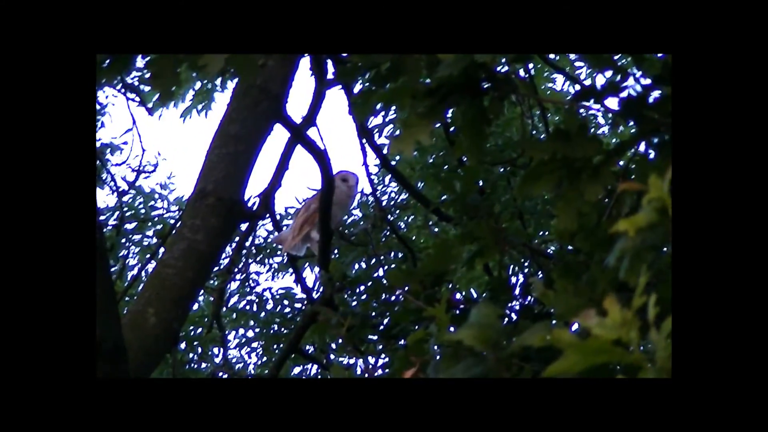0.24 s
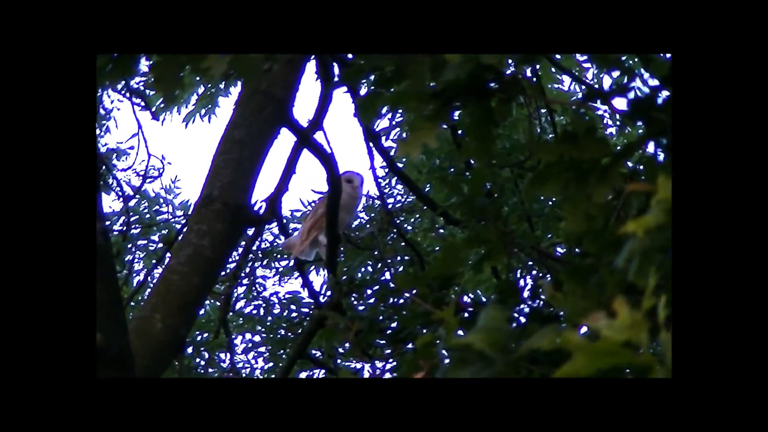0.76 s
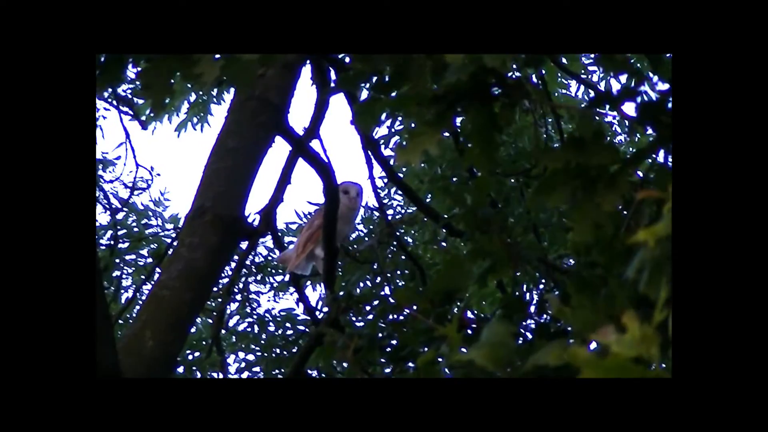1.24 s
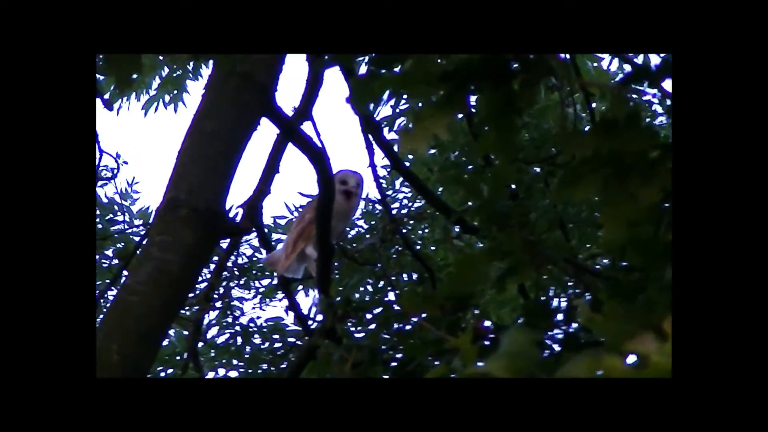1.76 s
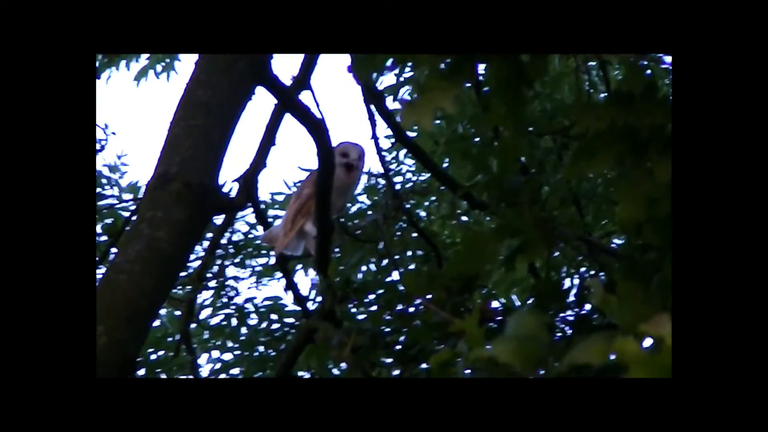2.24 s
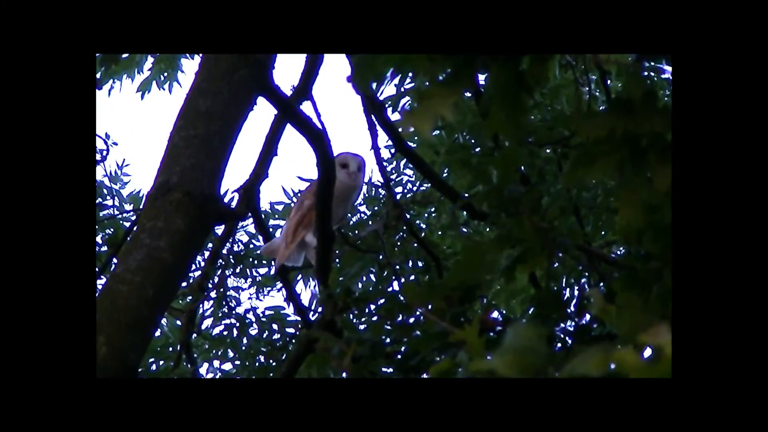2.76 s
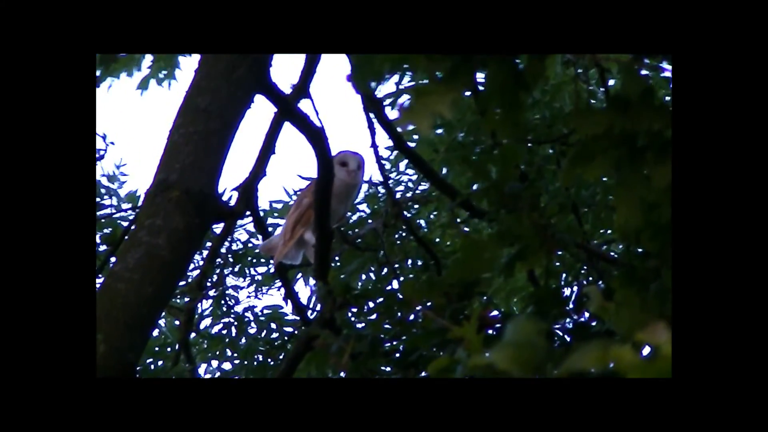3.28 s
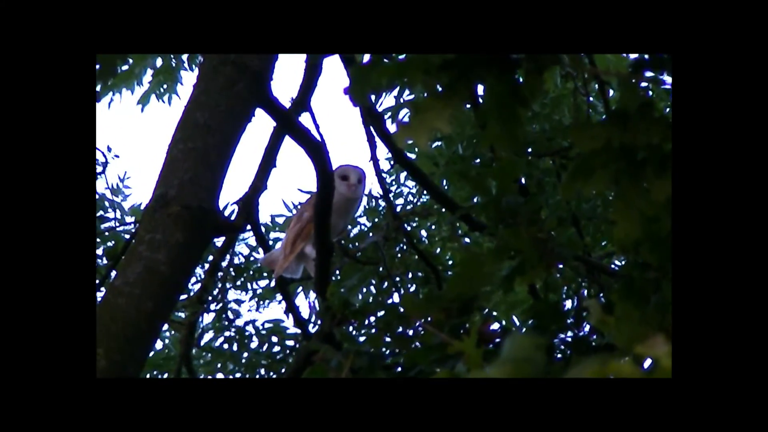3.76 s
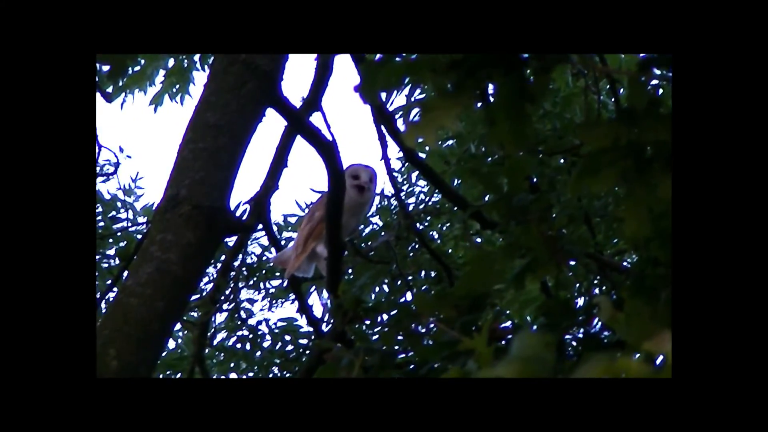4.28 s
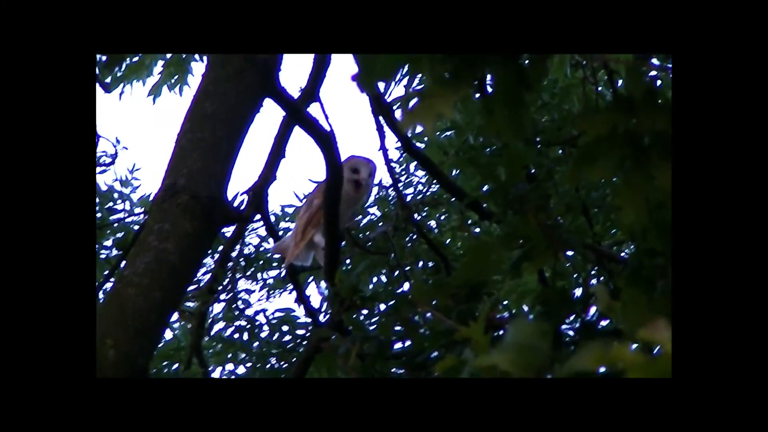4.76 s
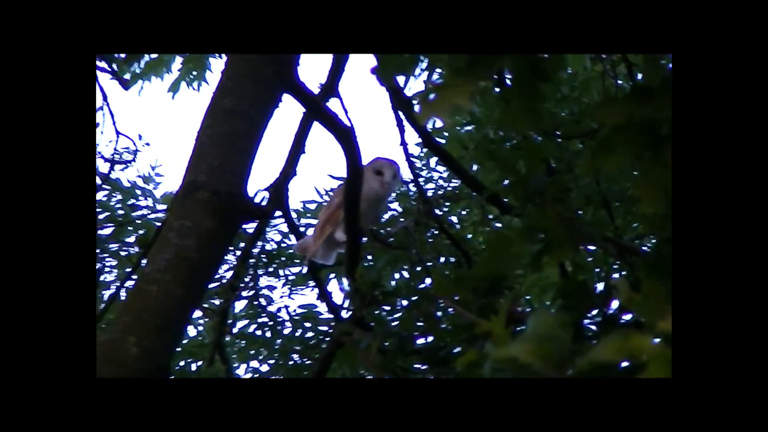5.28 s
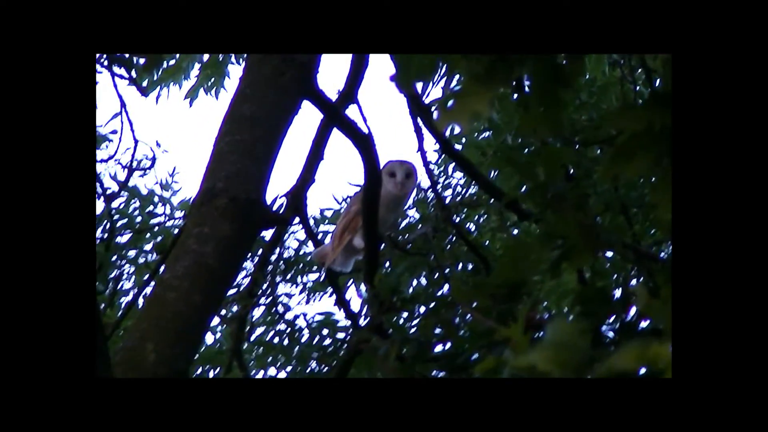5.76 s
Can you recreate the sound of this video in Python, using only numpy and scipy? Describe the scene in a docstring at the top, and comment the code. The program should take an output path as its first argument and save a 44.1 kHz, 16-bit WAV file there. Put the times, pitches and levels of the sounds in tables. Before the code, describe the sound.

In quiet trees, a faint airy rush and tiny camera motor whines are heard with soft grainy rustles. A sharp dry snap comes just before a young owl's long, harsh, hissing screech, which swells brighter and stops abruptly with a tiny squeak. After a quiet pause a second, slightly softer and shorter screech follows, leaving a brief leafy echo, then hush. The camera's microphone adds light hiss.

```python
"""Young barn owl screeching in a tree

From a branch come two long, harsh hisses of noise shaped by throat and perch, louder and brighter with effort;
brief harmonic squeaks open and close each one, and the crown lets them die away in scattered noise echoes.
Soft grainy rustles and a sharp snap of damped modes come first; a dull digital click falls in the first screech.
Behind lie a faint rush of coloured noise with the microphone's own hiss in its treble, narrow faint hums
and the tiny sine whines of the camera's focus motor."""
import sys
import numpy as np
from scipy import signal
from scipy.fft import rfft, irfft, next_fast_len
from scipy.io import wavfile

SR = 44100
rng = np.random.default_rng(int(sys.argv[2]) if len(sys.argv) > 2 else 0)


def master(y):
    """Save y as 16-bit WAV."""
    cut = np.clip(np.atleast_2d(y).T, -1, 1)
    pcm = np.round(cut * 32767)  # scale
    wavfile.write(sys.argv[1], SR, pcm.astype(np.int16))


N = 265570
TIME = np.arange(N) / SR   # s
SIZE = next_fast_len(N + SR)   # padded transform length, samples
FREQS = np.maximum(np.arange(SIZE // 2 + 1) * SR / SIZE, 1)   # Hz


def from_db(db):
    """Decibels to gain."""
    return 10 ** (np.asarray(db) / 20)


def rms_one(x):
    """Scale to unit rms."""
    return x / np.sqrt(np.mean(x ** 2) + 1e-20)


def at_hz(points, hz):
    """Read a table on a log-frequency axis."""
    points = np.array(points)
    return np.interp(np.log(hz), np.log(points[:, 0]), points[:, 1])


def bumps_db(rows):
    """Sum of bell-shaped peaks and notches."""
    return sum(db / (1 + (2 * (FREQS - hz) / width) ** 2) for hz, width, db in rows)


def coloured(x, gain_db):
    """Give a noise its spectrum."""
    return irfft(rfft(x, SIZE) * from_db(gain_db), SIZE)[..., :N]


def band(x, low_hz, high_hz, order=2):
    """Butterworth band-pass."""
    edges_hz = [low_hz, min(high_hz, SR / 2 - 100)]
    return signal.sosfilt(signal.butter(order, edges_hz, "band", fs=SR, output="sos"), x)


def drift(rate):
    """Random wander of spread 1 at about this many turns a second."""
    return rms_one(coloured(rng.standard_normal(N), -20 * np.log10(1 + (FREQS / rate) ** 2)))


def background_rush(rush_db=-65, swell_db=0.22):
    """A soft, even rush with the microphone's own hiss in the treble; wide low and middle, nearly mono treble."""
    # spectrum of the rush: (frequency [Hz], level [dB per Hz])
    air = [(24, -58), (40, -33), (108, -23.5), (174, -17), (387, -8.5), (417, -7.5), (722, -1.5),
           (1190, -9), (1280, -12), (2770, -16), (3140, -13), (3740, -16.5), (4030, -16.5), (4350, -15.5),
           (15500, -23.5)]
    # broad humps on it: (frequency [Hz], width [Hz], level [dB])
    humps = [(965, 270, 3.5), (1500, 790, 0.5), (3170, 690, 1.5)]
    # stereo spread: (frequency [Hz], side to mid [dB])
    spread = [(60, -3), (110, -3), (200, -11), (380, -9.5), (700, -16), (1290, -11), (2380, -6.5),
              (4400, -9.5), (8120, -24), (15000, -33)]
    colour_db = at_hz(air, FREQS) + bumps_db(humps)
    mid = coloured(rng.standard_normal(N), colour_db)
    side = coloured(rng.standard_normal(N), colour_db + at_hz(spread, FREQS))
    level_db = rush_db + swell_db * drift(10)
    return from_db(level_db) * (mid + side * np.array([[1], [-1]])) / mid.std()


def faint_hums():
    """Narrow drones swell and fade in the background: sines whose amplitude wanders at random."""
    # hums: (middle [s], half length [s], frequency [Hz], width [Hz], level [dB])
    hums = [(.7, .55, 155, 40, -85), (1.1, .7, 1163, 8, -75), (4.3, 1.6, 1165, 8, -81)]
    out = np.zeros(N)
    for middle, half_length, hz, width, db in hums:
        swell = np.exp(-((TIME - middle) / half_length) ** 2)
        drone = np.sqrt(2) * drift(width / 2) * np.sin(2 * np.pi * hz * TIME)
        out += from_db(db) * swell * drone
    return out


def focus_motor(step_s=0.0048, uneven_db=1.5, waver_db=3.0, flutter_hz=100):
    """The lens motor whines as wavering sines while it runs and pips once a frame, at random, while it hunts."""
    # steady runs: (start [s], end [s], frequency [Hz], mean level [dB], flutter depth [0-1])
    runs = [(0.691, 0.705, 5620, -72, 0), (0.715, 1.253, 3195, -76, .15), (1.204, 1.218, 5700, -68, 0),
            (1.27, 1.61, 4800, -81.5, .9), (1.315, 1.337, 5680, -72, 0), (1.477, 1.498, 5690, -73.5, 0),
            (1.562, 1.577, 5690, -73, 0)]
    # hunting in short steps: (start [s], end [s], frequency [Hz], mean level [dB], share of steps taken [0-1])
    hunts = [(.04, .68, 3200, -68.5, .9), (.08, .7, 4000, -71, .7), (2.88, 6.0, 4010, -71.5, .65),
             (2.84, 6.0, 3200, -73, .6)]
    steps_per_s = 25   # frames a second
    out = np.zeros(N)
    waver = from_db(waver_db * drift(25))
    flutter = np.sin(2 * np.pi * flutter_hz * TIME + drift(20))
    for start, end, hz, db, depth in runs:
        gate = np.clip(np.minimum(TIME - start, end - TIME) / 0.0036, 0, 1)
        out += from_db(db) * gate * waver * (1 + depth * flutter) * np.sin(2 * np.pi * hz * TIME)
    frame = np.round(TIME * steps_per_s).astype(int)   # nearest frame of each sample
    frame_s = np.arange(frame[-1] + 1) / steps_per_s
    pips = np.exp(-((TIME - frame_s[frame]) / step_s) ** 2)
    for start, end, hz, db, share in hunts:
        taken = (rng.random(len(frame_s)) < share) & (frame_s >= start) & (frame_s <= end)
        size = taken * from_db(db + uneven_db * rng.standard_normal(len(frame_s)))
        out += size[frame] * pips * np.sin(2 * np.pi * hz * TIME)
    return np.sqrt(2) * out   # sine peak to rms levels


def rustles(grain_db=3.0):
    """Brief grainy brushes: coloured noise of uneven strength under short bell-shaped swells."""
    # brushes: (middle [s], level [dB], half length [s])
    brushes = [(0.403, -65, 0.008), (0.55, -59.5, 0.011), (0.588, -68, .008), (.835, -63.5, 0.0073),
               (1.027, -64, .007), (1.182, -65, .008)]
    # their spectrum: (frequency [Hz], level [dB per Hz])
    colour = [(100, -40), (700, 0), (1800, 1), (5000, -1.5), (8000, -15), (15000, -27)]
    rough = rng.standard_normal(N) * from_db(grain_db * drift(400))
    grains = rms_one(coloured(rough, at_hz(colour, FREQS)))
    return grains * sum(from_db(db) * np.exp(-((TIME - s) / length) ** 2) for s, db, length in brushes)


def snap(scatter_db=-33, scatter_s=0.0071, low_hz=450):
    """Hard contacts set a few heavily damped modes ringing; nearby surfaces smear them a little."""
    # the dry snap and its rebounds: (time [s], level [dB])
    contacts = [(1.2606, -21.5), (1.2622, -38), (1.2646, -38)]
    # ringing modes: (frequency [Hz], level [dB], 60 dB decay [s])
    modes = [(918, -20, 0.036), (1410, -17, 0.015), (2040, -4, 0.0042), (2960, -5, 0.0024),
             (4070, -12.5, 0.014), (5300, -9.5, 0.0026), (7000, -14.5, 0.0043), (8100, -20.5, 0.0043),
             (11400, -22, .002)]
    clicks = np.zeros(N) + 1e-18
    for s, db in contacts:
        clicks[round(s * SR)] = from_db(db)
    first_s, first_db = contacts[0]
    age = TIME - first_s
    smear = rng.standard_normal(N) * (age > 0) * np.exp(-np.abs(age) / scatter_s)
    clicks += from_db(first_db + scatter_db) * smear
    out = np.zeros(N)
    for k, (hz, db, t60) in enumerate(modes):
        r, w = from_db(-60 / (t60 * SR)), 2 * np.pi * hz / SR   # decay per sample, radians per sample
        ring = signal.lfilter([0, np.sin(w)], [1, -2 * r * np.cos(w), r * r], clicks)
        out += (-1) ** k * from_db(db) * ring   # alternate polarity
    return band(out, low_hz, 15000)


def squeaks(jitter=0.032, edge_s=0.0018):
    """The syrinx sounds short clear gliding notes of unsteady pitch while the pressure is low."""
    # notes: (start [s], length [s], start pitch [Hz], end pitch [Hz], level [dB], extra fundamental [dB])
    notes = [(1.608, .007, 1740, 1670, -42, 7), (1.616, .009, 1760, 1850, -41.5, 12),
             (2.675, .014, 1720, 1690, -43.5, -6), (4.255, .015, 1430, 1340, -43.5, 0),
             (5.072, .016, 1510, 1370, -42, -2), (5.098, .016, 1270, 1140, -53, 0)]
    # overtones: (multiple of the pitch, level before each note is scaled [dB])
    harmonics = [(1, -8), (2, 3.5), (3, -5), (4, -8.5), (5, -18), (6, -23)]
    out = np.zeros(N)
    waver = 1 + jitter * drift(300)
    for start, length, from_hz, to_hz, db, fundamental_db in notes:
        span = (TIME >= start) & (TIME < start + length + edge_s)
        t = TIME[span] - start
        pitch_hz = np.interp(t, [0, length], [from_hz, to_hz]) * waver[span]
        phase = 2 * np.pi * np.cumsum(pitch_hz) / SR
        note = rms_one(sum(from_db(level + fundamental_db * (multiple == 1)) * np.sin(multiple * phase)
                           for multiple, level in harmonics))
        edges = np.clip(np.minimum(t, length + edge_s - t) / edge_s, 0, 1)
        out[span] += from_db(db) * note * edges
    return out


def throat_hiss(jet, throat, bright_db):
    """The jet takes the colour of throat and perch; its treble is set against the main resonance."""
    # reflections from the perch reinforce and cancel narrow bands: (frequency [Hz], width [Hz], level [dB])
    perch = [(1804, 40, 4.1), (2110, 40, 6.6), (2175, 40, -4.9), (2394, 40, 4.9), (2461, 40, -6.8),
             (2537, 60, 4.2), (2622, 40, -6.0), (2689, 40, 7.7), (2800, 60, -4.7), (2893, 40, 8.2),
             (2952, 40, -6.2), (3074, 90, 5.4), (3333, 40, -4.0), (3488, 60, 4.2), (3605, 40, -6.5),
             (3706, 90, -4.9), (4302, 40, 9.3), (4844, 40, -6.4), (4956, 40, -5.7), (5373, 60, -3.9),
             (5595, 60, 5.0), (6237, 60, -5.2), (6494, 250, 2.2), (7810, 90, -4.4), (8030, 90, 5.9),
             (8256, 90, 4.1), (9439, 250, -5.1), (10364, 500, 4.4), (12526, 140, -3.9), (13478, 140, 4.5)]
    low_cut_db = -20 * np.log10(1 + (900 / FREQS) ** 10)
    hiss = coloured(jet, at_hz(throat, FREQS) + bumps_db(perch) + low_cut_db)
    body = coloured(hiss, np.where(FREQS < 3700, 0, -200))
    treble = rms_one(hiss - body)
    resonance = band(body, 2300, 3700, order=6)
    return body / resonance.std() + treble * from_db(bright_db)


def screech(row, throats, rasp_db=-0.78, rasp_rate=260, flutter_db=-0.15):
    """Turbulent air rasps through the throat: louder and brighter with effort, its colour shifting as the beak opens."""
    start, full_from, full_to, end, full_db, full_bright_db, thrust_after, opens_from, opens_to = row
    # effort rises quickly, swells to its full strength, holds, sags and lets go
    attack_s, attack_db = 0.026, 5.5
    swell_db_per_s, sag_db_per_s = 7, 11.5
    release_s, release_db = 0.032, 9.5
    gate_s = 0.007
    gate = np.interp(TIME, [start - gate_s, start, end, end + gate_s], [0, 1, 1, 0])
    swell_db = -swell_db_per_s * np.maximum(full_from - TIME, 0)
    sag_db = -sag_db_per_s * np.maximum(TIME - full_to, 0)
    ends_db = np.interp(TIME, [start, start + attack_s, end - release_s, end], [attack_db, 0, 0, release_db])
    effort_db = swell_db + sag_db - ends_db
    # the first thrust of air overshoots briefly, at the main resonance
    peak_db, thrust_s, dulling = 3, 0.022, 0.75   # dulling: dB of treble lost per dB of thrust
    thrust_db = peak_db * np.exp(-((TIME - start - thrust_after) / thrust_s) ** 2)
    # harder blowing is brighter, down to the effort at which the hiss is dullest
    bright_per_effort, dullest_effort_db = 1.2, -5.5   # dB of treble per dB of effort, dB
    effort_bright_db = bright_per_effort * np.maximum(effort_db, dullest_effort_db)
    bright_db = full_bright_db + effort_bright_db - dulling * thrust_db
    opening = np.interp(TIME, [opens_from, opens_to], [0, 1])
    jet = rng.standard_normal(N) * from_db(rasp_db * drift(rasp_rate) + flutter_db * drift(30))
    half_open, wide_open = (throat_hiss(jet, throat, bright_db) for throat in throats)
    hiss = (1 - opening) * half_open + opening * wide_open
    return gate * from_db(full_db + effort_db + thrust_db) * hiss


def digital_click():
    """One dull digital click: a single-sample impulse softened by a gentle band-pass."""
    # the click: (time [s], impulse level before filtering [dB], low-pass [Hz])
    s, db, top_hz = (2.4914, -20, 3000)
    impulse = from_db(db) * (np.arange(N) == round(s * SR))
    return band(1e-18 - impulse, 20, top_hz, order=1)


def tree_crown(x, twigs_db=-10, twigs_s=0.034, tail_db=-14, side_db=-12, build_s=0.01):
    """Near twigs scatter the treble at once; the leaves further off give a short diffuse tail."""
    # how long the leaves hold each pitch: (frequency [Hz], 60 dB decay [s])
    crown_t60 = [(1000, 0.26), (2000, 0.033), (3300, 0.48), (5000, 0.36), (7000, 0.33), (14000, 0.46)]
    t = TIME[:SR // 2]
    edges_hz = np.geomspace(800, 16000, 9)
    twigs = band(rng.standard_normal(len(t)), 3180, 11800) * np.exp(-t / twigs_s) * (t > .001)
    white = rng.standard_normal((2, 2, len(t)))   # neighbouring bands take different noise, each mid and side
    tail = np.zeros((2, len(t)))
    for k, (low_hz, high_hz) in enumerate(zip(edges_hz, edges_hz[1:])):
        t60 = at_hz(crown_t60, np.sqrt(low_hz * high_hz))
        tail += band(white[k % 2], low_hz, high_hz) * np.exp(-np.log(1000) * t / t60)
    tail *= 1 - np.exp(-t / build_s)
    mid, side = from_db(tail_db) * tail / np.linalg.norm(tail[0])
    near = from_db(twigs_db) * twigs / np.linalg.norm(twigs)
    echoes = near + mid + from_db(side_db) * side * np.array([[1], [-1]])
    wet = signal.fftconvolve(x[None], echoes, axes=1)[:, :N]
    return (x + wet) / np.sqrt(1 + np.sum(echoes[0] ** 2))


def scene():
    """The owl in its tree, small near sounds, a dull digital click and the background."""
    # screeches: (start [s], full effort from [s], to [s], end [s], full effort level [dB], brightness there [dB],
    # opening thrust after [s], beak opens from [s], to [s])
    screeches = [(1.619, 2.25, 2.49, 2.7026, -36, 0.6, 0.025, 1.95, 2.05),
                 (4.26, 4.92, 4.938, 5.099, -38.5, 1.7, 0.059, 4.7, 4.88)]
    # throat colour, beak half open then wide open: (frequency [Hz], level [dB per Hz])
    first_throat = [
        [(740, -49), (1250, -24.5), (1460, -16), (1640, -21), (2450, -2), (2780, -1), (3130, -1.5),
         (3700, -9.5), (4200, -10), (6530, -10.5), (9650, -19), (10600, -16.5), (11500, -23), (14000, -29),
         (15500, -37)],
        [(740, -44), (1250, -29.5), (1660, -20), (2070, -7), (2530, -4), (2970, -2), (3470, -6), (3700, -9.5),
         (4290, -6.5), (4810, -8.5), (8240, -11.5), (9650, -17.5), (10600, -18.5), (14000, -29), (15500, -41)],
    ]
    second_throat = [
        [(740, -48), (1250, -23.5), (1660, -20), (2050, -10), (3090, -1), (3700, -6), (4290, -10.5),
         (4810, -12), (5820, -12.5), (6890, -15), (8240, -18.5), (8590, -19.5), (10400, -19), (13700, -33),
         (15500, -45)],
        [(740, -61), (1250, -28), (1400, -20), (2250, -9.5), (2610, -1.5), (3000, 0.5), (3290, -1),
         (4290, -4.5), (4710, -9), (5640, -9.5), (8240, -13.5), (9150, -15), (10200, -16), (11900, -23.5),
         (15500, -44)],
    ]
    owl = squeaks() + screech(screeches[0], first_throat) + screech(screeches[1], second_throat)
    background = background_rush() + faint_hums()
    near = focus_motor() + rustles() + snap()
    return background + near + tree_crown(owl) + digital_click()


def record(dry):
    """The top is cut steeply by an elliptic low-pass."""
    cutoff_hz = 15600
    return signal.sosfilt(signal.ellip(10, .1, 70, cutoff_hz, fs=SR, output="sos"), dry)


dry = scene()
out = record(dry)
master(out)
```